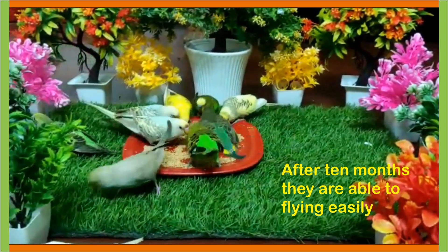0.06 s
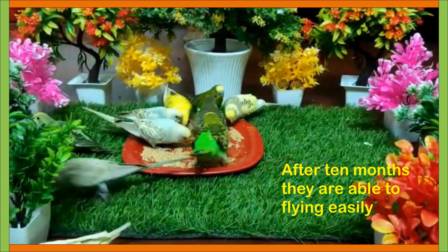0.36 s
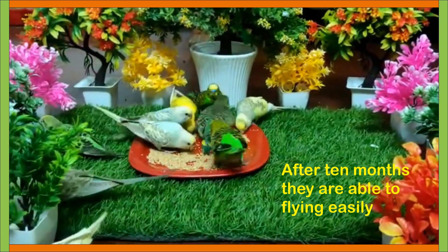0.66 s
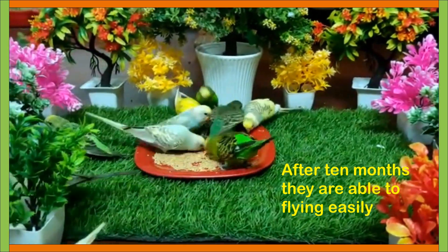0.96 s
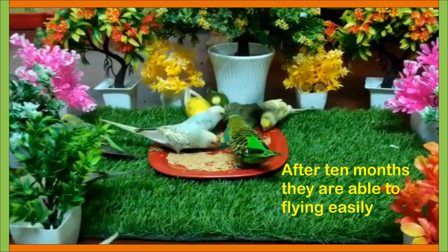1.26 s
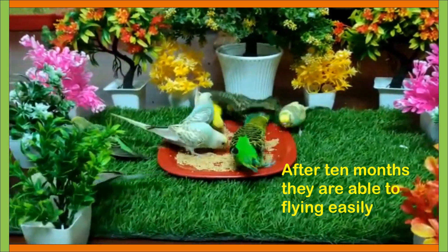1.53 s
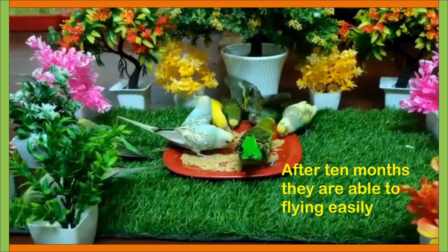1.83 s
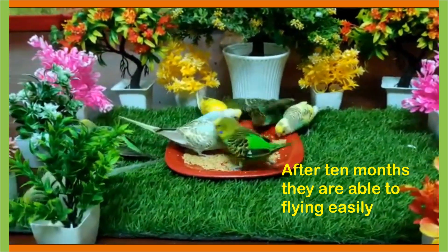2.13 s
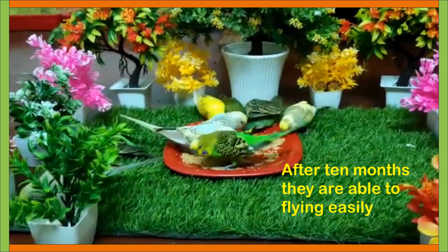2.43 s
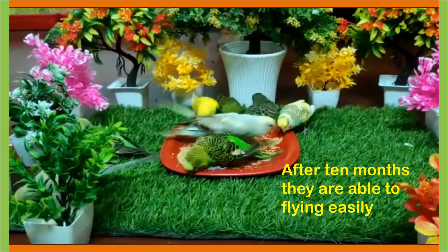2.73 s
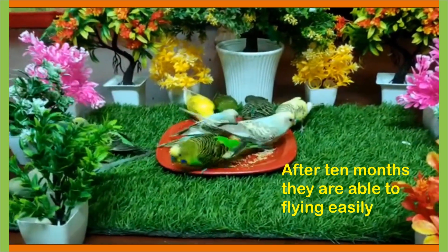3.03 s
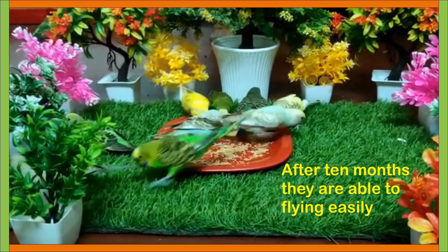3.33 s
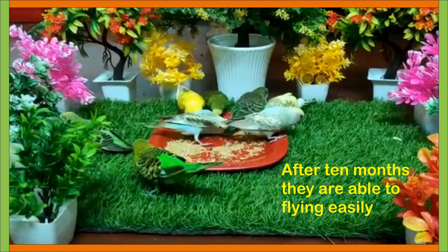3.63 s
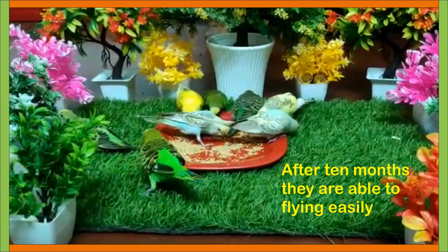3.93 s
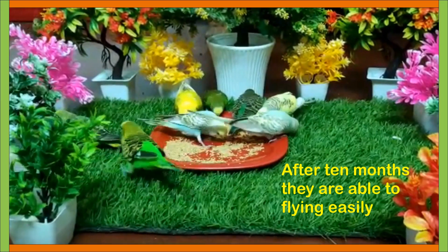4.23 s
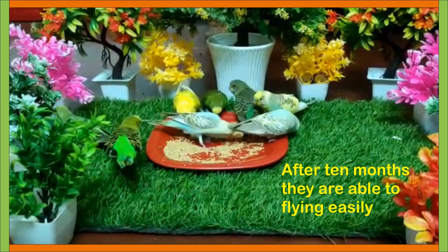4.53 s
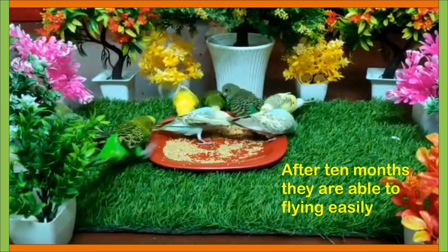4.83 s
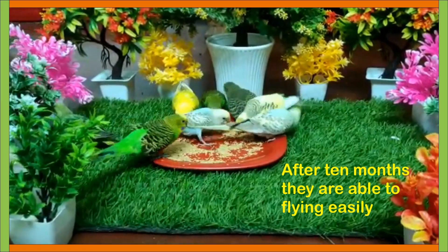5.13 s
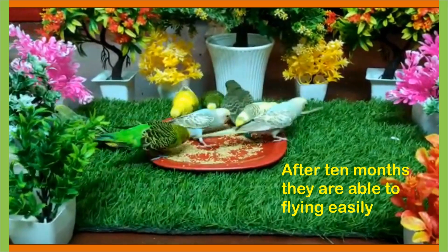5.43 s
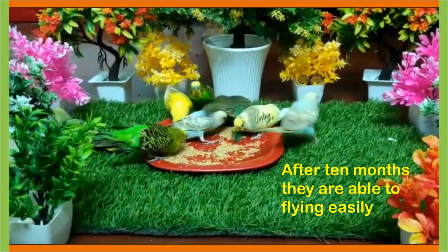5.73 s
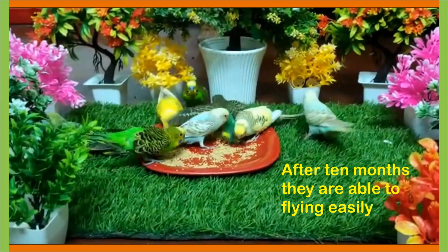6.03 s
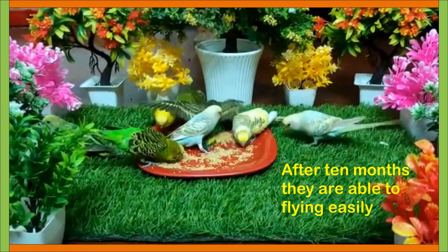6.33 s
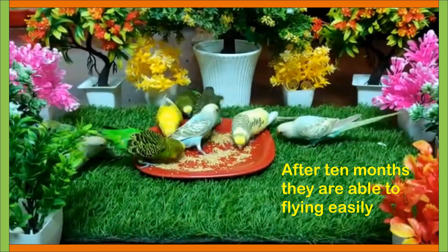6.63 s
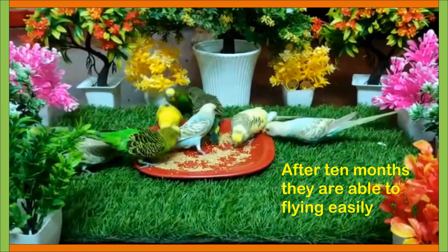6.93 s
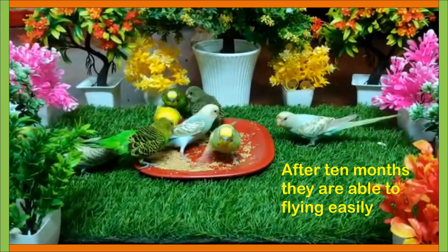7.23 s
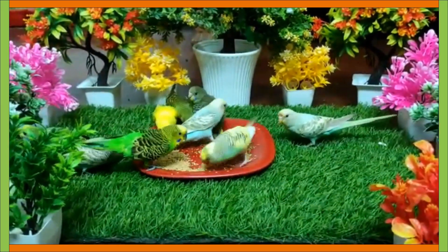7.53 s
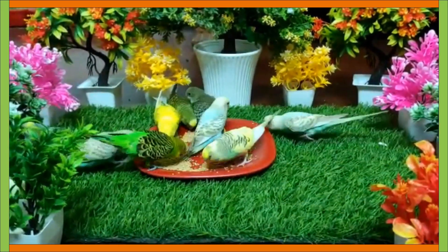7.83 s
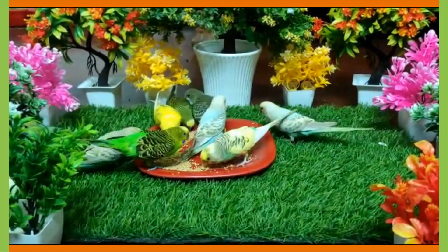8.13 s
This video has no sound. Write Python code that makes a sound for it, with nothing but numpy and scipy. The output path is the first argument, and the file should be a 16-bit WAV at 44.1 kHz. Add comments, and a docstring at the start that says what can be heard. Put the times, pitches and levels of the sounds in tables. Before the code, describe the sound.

Young budgerigars beg with wheezy rasps, hiss and squawk in a small room while seed husks crunch and beaks tap.

```python
"""Crunching seed and a swelling hiss come first, then the long wheezy rasps of young budgerigars begging
round a dish in a small room. Each rasp starts as a whistle on the membrane of the syrinx and breaks into
two fluttering strands. In between the birds hiss through narrow throats and squawk three times.
Clucks, beak taps, soft scuffles and one sharp, dry broadband click come through, over a bed of
low rumble, faint hum and thin air."""
import sys
import numpy as np
from scipy import signal
from scipy.fft import rfft, irfft, next_fast_len
from scipy.io import wavfile
from scipy.ndimage import map_coordinates

SR = 44100
rng = np.random.default_rng(int(sys.argv[2]) if len(sys.argv) > 2 else 0)


def unload_audio(sound):
    """Save the sound as a 16-bit wav file, at the path given as the first command line argument."""
    columns = np.transpose(np.atleast_2d(sound))
    # keep every value between -1 and 1, then stretch to whole-number steps
    steps = np.round(np.clip(columns, -1, 1) * 32767)
    wavfile.write(sys.argv[1], SR, steps.astype(np.int16))


N = 369116
T = np.arange(N) / SR

# EQ curves of the room's rumble and air: f/Hz, gain/dB
RUMBLE_EQ = [(22, 4.5), (42, -36), (60, 6.5), (105, -6), (145, 5), (200, -1), (290, -7.5), (420, -22),
             (700, -11.5), (2000, -79)]
AIR_EQ = [(100, 2.5), (500, 0.5), (680, 2), (1000, 4.5), (1500, -1), (2700, -3), (4500, -6), (6200, -5.5),
          (7700, 4.5), (8800, -4), (10000, -30), (15500, -23)]
# swells of the low drone and of the hum above it: t/s, length/s, level/dB
DRONE_SWELLS = [(0.28, 0.48, -57), (1.25, 0.94, -54), (3.3, 0.89, -56.5)]
HUM_SWELLS = [(0.2, 0.55, -68), (3.45, 0.35, -61.5), (4.72, 0.38, -61), (5.72, 0.72, -61),
              (7.88, 0.81, -53.5)]
# dull bumps: t/s, length/s, f/Hz, relative level/dB
BUMPS = [(6.076, 0.022, 343, -47), (6.419, 0.19, 281.7, -47.5), (7.699, 0.06, 366, -49),
         (8.168, 0.18, 317, -44.5), (8.174, 0.2, 54.5, -39.5)]
# wings and feet brushing the mat: t/s, length/s, level/dB
SCUFFLES = [(0.624, 0.18, -56.5), (1.035, 0.057, -52), (1.465, 0.082, -53.5), (2.035, 0.13, -63.5),
            (6.165, 0.078, -53), (7.098, 1.6, -62)]
# bouts of husking seed: t/s, length/s, level/dB
HUSK_BOUTS = [(0.0, 1.7, -52.5), (1.45, 1.69, -55), (3.45, 0.14, -50), (3.78, 0.34, -58), (4.47, 0.27, -62),
              (5.13, 0.22, -57), (5.62, 0.396, -56.5), (6.06, 0.44, -53), (7.18, 0.57, -53.5),
              (7.9, 0.58, -53.5)]
# a sharp, dry broadband click at 6.024 s; the other rows are beaks on seed and dish:
# t/s, ring level/dB, ring f/Hz, snap level/dB
CLICKS = [(0.4165, -29, 7440, -50), (0.4933, -44, 7500, -53), (0.62, -40, 7500, -46),
          (0.928, -58, 7500, -43), (0.9772, -53, 7000, -42), (1.636, -32.5, 7050, -41.5),
          (1.871, -40, 7500, -55), (2.2608, -53, 7500, -35), (2.6953, -33, 7500, -48),
          (3.215, -49, 5860, -56), (3.465, -45, 7500, -42), (3.7864, -50, 7940, -43),
          (3.944, -45, 7360, -58), (5.14, -46, 6900, -50), (5.286, -38.5, 7800, -54),
          (6.024, -46, 7500, -29), (6.175, -44, 7540, -38), (6.8206, -41, 6000, -44),
          (7.457, -37.5, 7640, -50), (7.69, -36.5, 7830, -53), (7.9264, -39, 7500, -55)]
# EQ curves of a cracking husk and of a click's snap: f/Hz, gain/dB
HUSK_EQ = [(1000, -19), (3000, -8), (8000, 10), (10000, -5), (14000, -11.5), (16000, -20)]
SNAP_EQ = [(300, -39), (1500, 4), (6000, 6), (10000, -1), (15000, -9)]
# short falling clucks: t/s, relative level/dB
CLUCKS = [(0.282, -69), (0.402, -42.5), (0.615, -52.5), (0.721, -52), (0.817, -42.5), (1.036, -43),
          (1.395, -51.5), (1.873, -54), (2.048, -48.5), (3.074, -54), (3.56, -51.5)]
# hisses: t/s, length/s, relative level/dB, level ramp/dB, wheeze start f/Hz, wheeze target f/Hz,
# squeak level/dB
HISSES = [(0, 0.52, -58.5, 13, 6600, 5890, -48), (0.411, 0.17, -39.5, -15, 5900, 5800, -54),
          (0.72, 0.49, -47.5, 3, 6090, 5420, -46), (1.839, 0.33, -51, -8.5, 5840, 4920, -47),
          (2.286, 0.19, -45.5, -12.5, 4340, 4230, -42.5), (2.698, 0.14, -51.5, -2, 5330, 5080, -50.5),
          (3.795, 0.044, -54, 7, 5300, 4810, -47), (4.451, 0.25, -48, -30, 4930, 4230, -47),
          (5.158, 0.11, -68, 2, 5000, 4800, -61), (5.291, 0.39, -51.5, -3.5, 5160, 4400, -49.5),
          (6.043, 0.49, -48.5, 0, 6170, 5180, -48.5), (6.817, 0.39, -50.5, -0.5, 5480, 4450, -47.5),
          (7.173, 0.22, -45.5, -2.5, 5620, 5020, -53), (7.691, 0.4, -47.5, -1.5, 5630, 4820, -46),
          (8.104, 0.25, -66, 25.5, 5700, 4900, -57)]
# squawks: t/s, length/s, relative crest level/dB, crest position/share of call, lower voice f/Hz,
# upper voice f/Hz, upper voice gain/dB, overtone trim/dB, opening roughness/0-1
SQUAWKS = [(2.802, 0.16, -29, 0.76, 3036, 3840, -0.5, -1.5, .45),
           (3.497, 0.165, -29, 0.68, 3118, 3950, 2.5, 0.5, 0.41),
           (4.675, 0.15, -29, 0.87, 3140, 4193, 1.5, 2, 0.97)]
# begging rasps: t/s, length/s, relative level/dB, level ramp/dB, pitch fall/Hz, whistle f/Hz,
# time to break/s, overtone trim/dB
BEGS = [(0.274, 0.5, -42, -3, 399.7, 3900, 0.045, 1), (1.087, 0.28, -33, -27.5, 1112, 4010, 0.053, 2.5),
        (1.417, 0.41, -41, -4, 411.7, 3804, 0.046, 0), (2.21, 0.52, -42, -5, 352, 3844, 0.054, 2),
        (3.229, 0.39, -42.5, 1.5, 247.7, 3937, 0.041, 0), (4.015, 0.41, -41.5, -5, 398.3, 3636, 0.056, 0.5),
        (5.59, 0.39, -42.5, -1, 302.6, 3705, .04, -0.5), (7.084, 0.54, -39.5, -7.5, 497, 3838, 0.041, -1),
        (7.991, 0.39, -40.5, 0, 296.7, 3776, 0.03, 1.5)]
# throat resonances for each kind of call: f/Hz, gain/dB
HISS_THROAT = [(800, -32), (1700, -2.5), (2200, -4), (2850, 26), (3600, 2), (4500, 24.5), (6300, 14.5),
               (7000, 15), (7800, 13.5), (8700, 17), (10000, -17), (15000, -33)]
SQUAWK_THROAT = [(400, -27), (1000, -10), (1700, 1), (2200, 9.5), (3050, 4), (4100, 4), (5100, 4),
                 (6100, 6), (6900, 2), (8000, 4.5), (9200, 1.5), (10200, -38), (15000, -18.5)]
BEG_THROAT = [(1000, -11), (1850, -2.5), (2250, 4), (2900, 6), (3650, 3), (4150, 9.5), (4600, 8.5),
              (5500, -10), (6600, -1), (7700, 6.5), (8900, 3), (10000, -18), (15000, -60)]
# stereo tilt: f/Hz, left minus right/dB
STEREO_TILT = [(150, 0), (500, 2.5), (2400, 0.5), (4000, 1.5), (8000, -4.5), (12000, -1.5)]


def undb(db):
    """Decibels to gain."""
    return 10 ** (np.asarray(db) / 20)


def unit(x):
    """Scale to rms 1."""
    return x / np.sqrt(np.mean(x ** 2) + 1e-18)


def eq(x, curve):
    """Filter by a curve of (f/Hz, gain/dB) points."""
    hz, db = np.transpose(curve)
    size = next_fast_len(len(x) + 1024)
    f = np.maximum(np.fft.rfftfreq(size, 1 / SR), 1)
    return irfft(rfft(x, size) * undb(np.interp(np.log(f), np.log(hz), db)), size)[:len(x)]


def noise(t, curve):
    """Noise of rms 1, coloured by an EQ curve."""
    return unit(eq(rng.standard_normal(len(t)), curve))


def wander(t, rate):
    """Smooth random modulation of spread near 1 that changes rate times a second."""
    return map_coordinates(rng.standard_normal(8192), [(t - t[0]) * rate], order=3, mode="wrap")


def phase_of(hz):
    """Running phase of a moving pitch."""
    return 2 * np.pi * np.cumsum(hz) / SR


def gate(t, fade_s):
    """Fade in and out."""
    return np.clip(np.minimum(t - t[0], t[-1] - t) / fade_s, 0, 1)


def swells(rows, fade_s):
    """Gain of (t/s, length/s, level/dB) swells that rise, hold and fall."""
    return sum(undb(db) * np.clip(np.minimum(T - s, s + length - T) / fade_s, 0, 1)
               for s, length, db in rows)


def add(track, start_s, sound):
    """Mix a sound into a track."""
    i = int(start_s * SR)
    track[i:i + len(sound)] += sound[:N - i]


def room(x, lead_ms, pan_db, wet_db, t60_s=0.39):
    """Direct sound reaches the right first; dense reflections differ per side. Positive pan is left."""
    t = T[:SR // 2]
    tails = rng.standard_normal((2, len(t))) * undb(-60 * t / t60_s) * (t > .002)
    tails /= np.linalg.norm(tails, axis=1, keepdims=True)
    delayed = map_coordinates(x, [np.arange(N) - lead_ms * SR / 1000], order=3)
    reverb = np.array([signal.fftconvolve(x, tail)[:N] for tail in tails])
    mix = np.array([delayed, x]) + undb(wet_db) * reverb
    return mix * undb([[pan_db / 2], [-pan_db / 2]]) / np.sqrt(1 + undb(2 * wet_db))


def room_air():
    """A thin, wide hiss whose level drifts a little."""
    left, right, centre = (noise(T, AIR_EQ) for _ in range(3))
    return (np.array([left, right]) + 0.22 * centre) * undb(-56 + 1.2 * wander(T, 8))


def rumble():
    """The room rumble grows, then holds, over a sub-bass shudder."""
    bed = noise(T, RUMBLE_EQ) * undb(np.interp(T, [0, 4.86], [-59.5, -53]))
    shudder = unit(wander(T, 22) * np.sin(2 * np.pi * 27.4 * T))
    return bed + undb(-66) * shudder


def humming(drone_hz=83.7, hum_hz=172.6):
    """A wavering drone and a hum about one and two octaves up, each swelling from a quiet floor."""
    drone = np.sin(phase_of(drone_hz * (1 + 0.0045 * wander(T, 11))))
    hum_phase = phase_of(hum_hz * (1 + 0.00958 * wander(T, 12)))
    hum = np.sin(hum_phase) + undb(-2) * np.sin(2 * hum_phase)
    drone_gain = undb(-67) + swells(DRONE_SWELLS, fade_s=0.17)
    hum_gain = undb(-75.5) + swells(HUM_SWELLS, fade_s=0.17)
    return drone_gain * drone + hum_gain * hum


def bumping():
    """Dull bumps: soft-edged low tones of unsteady pitch."""
    out = np.zeros(N)
    for start_s, length_s, hz, db in BUMPS:
        t = T[:int(length_s * SR)]
        tone = np.sin(phase_of(hz * (1 + 0.093 * wander(t, 129.6))))
        add(out, start_s, undb(db - 1.5) * np.hanning(len(t)) * tone)
    return out


def scuffling():
    """Jostling birds brush the mat in soft, grainy patches of midrange noise."""
    out = np.zeros(N)
    for start_s, length_s, db in SCUFFLES:
        t = T[:int(length_s * SR)]
        brush = noise(t, [(400, 6.5), (650, 12.5), (1050, 14), (1700, 8.5), (4000, -75)])
        grain = undb(3.6 * wander(t, 104.3))
        add(out, start_s, undb(db) * unit(brush * grain) * gate(t, 0.0022))
    return room(out, lead_ms=.11, pan_db=1.5, wet_db=-4)


def husking(cracks_per_s=900):
    """Seed husks splinter in small bites, each a cluster of crisp cracks, a few much louder."""
    impulses = (rng.random(N) < cracks_per_s / SR) * rng.choice([-1, 1], N)
    size_db = 3.5 * np.minimum(rng.exponential(size=N), 4)
    bite_db = 5 * wander(T, 20)
    splinter = rng.standard_normal(256) * np.exp(-T[:256] / .0006)
    cracks = signal.fftconvolve(impulses * undb(size_db + bite_db), splinter)[:N]
    crunch = unit(eq(cracks, HUSK_EQ)) * swells(HUSK_BOUTS, fade_s=0.0073)
    return room(crunch, lead_ms=0.132, pan_db=1, wet_db=-2)


def clicking(snap_s=0.00094, ring_s=0.0074):
    """Each click is a broadband snap with a brief treble ring; a dominant snap sounds sharp and dry."""
    out, t = np.zeros(N), T[:SR // 30]
    for start_s, ring_db, hz, snap_db in CLICKS:
        ring_eq = [(hz / 8, -36), (hz * .6, -20), (hz, 0), (hz * 1.1, -3), (hz * 1.35, -34)]
        ring = noise(t, ring_eq) * np.exp(-t / ring_s)
        snap = noise(t, SNAP_EQ) * np.exp(-t / snap_s)
        add(out, start_s, undb(ring_db) * ring + undb(snap_db) * snap)
    return room(out, lead_ms=.11, pan_db=1.5, wet_db=-4)


def clucking(note_hz=880, drop_hz=1620, drop_s=0.00166):
    """A dry click that drops from the treble to a hollow note within a few milliseconds."""
    out, t = np.zeros(N), T[:SR // 30]
    envelope = np.exp(-((t - .006) / .0065) ** 2) * gate(t, 0.00037)
    for start_s, db in CLUCKS:
        tone = np.sin(phase_of(note_hz + drop_hz * np.exp(-t / drop_s) + 80 * wander(t, 615)))
        knock = noise(t, [(400, -20), (900, 0), (2200, -8), (4000, -30)])
        add(out, start_s - .001, undb(db + 2.5) * envelope * (tone + undb(-5) * knock))
    return room(out, lead_ms=0.16, pan_db=1.5, wet_db=-8)


def effort(start_s, length_s, level_db, ramp_db, onset_db, attack_s):
    """Sample times and level/dB of a call: the onset settles quickly into a steady fade or push."""
    t = np.arange(start_s, start_s + length_s, 1 / SR)
    age = t - start_s
    return t, level_db + ramp_db * age / length_s + onset_db * np.exp(-age / attack_s)


def moving_throat(t, x, curve, shift=.045, moves_per_s=28):
    """Resonances shift as the throat widens and narrows."""
    wide = eq(x, [(hz * (1 - shift), db) for hz, db in curve])
    narrow = eq(x, [(hz * (1 + shift), db) for hz, db in curve])
    tightness = (1 + np.tanh(2 * wander(t, moves_per_s))) / 2
    return unit(wide + tightness * (narrow - wide))


def note_run(t, gap_s=.036, fade_s=.026, slide_hz=100, scatter_hz=340, scatter_db=3):
    """Gain and pitch offset/Hz of a run of short notes: each starts sharply, slides down and fades."""
    gap, pitch, size = rng.uniform(-1, 1, (64, 3)).T
    starts = np.append(0, np.cumsum(gap_s * (1 + gap / 2)))
    note = np.searchsorted(starts, t - t[0], side="right") - 1
    age = t - t[0] - starts[note]
    gain = undb(scatter_db * size[note]) * np.minimum(age / .002, 1) * np.exp(-age / fade_s)
    return unit(gain), scatter_hz * pitch[note] + slide_hz * (1 - age / fade_s)


def scratchy_tone(t, hz):
    """A thin tone, frayed by a waver and a faster jitter in its pitch."""
    return unit(np.sin(phase_of(hz + 220 * wander(t, 200) + 220 * wander(t, 1200))))


def hissing(twitter_hz=7520, squeak_hz=2729, squeak_fall_hz=411.5):
    """Wheezy sinking notes over air rattling in a narrow throat; a twitter above, a squeak below."""
    out = np.zeros(N)
    for *shape, first_hz, target_hz, squeak_db in HISSES:
        t, db = effort(*shape, onset_db=3, attack_s=.03)
        share = (t - t[0]) / (t[-1] - t[0])
        note_gain, bend_hz = note_run(t)
        wheeze_hz = target_hz + (first_hz - target_hz) * np.exp(-share / .3)
        wheeze = note_gain * scratchy_tone(t, wheeze_hz + bend_hz)
        twitter = note_gain * scratchy_tone(t, twitter_hz + bend_hz)
        warble_hz = squeak_hz - squeak_fall_hz * share + 200 * wander(t, 70) + 250 * wander(t, 500)
        squeak = unit(np.sin(phase_of(warble_hz)) * undb(2 * wander(t, 110)))
        breath = moving_throat(t, rng.standard_normal(len(t)), HISS_THROAT)
        rattle = unit(undb(3.2 * wander(t, 380)))
        rush = undb(3.5) * wheeze + undb(-1.5) * twitter + undb(-2.5) * breath
        add(out, t[0], rattle * (undb(db) * rush + undb(squeak_db) * squeak) * gate(t, .008))
    return room(out, lead_ms=0.12, pan_db=0, wet_db=1)


def syrinx(t, hz, rough, swing_hz, jump_hz, flutter_hz, shimmer_db, second_db, third_db):
    """A whistling membrane; when rough, it flutters and leaps between a high and a low pitch."""
    flutter = phase_of(flutter_hz * (1 + 0.2204 * wander(t, 300)))
    leaps = np.tanh(2 * wander(t, 170))
    phase = phase_of(hz + rough * (swing_hz * np.sin(flutter) + jump_hz * leaps))
    strength = undb(shimmer_db * wander(t, 198.3)) * (1 + .5 * rough * np.cos(flutter))
    tone = np.sin(phase) + undb(second_db) * np.sin(2 * phase) + undb(third_db) * np.sin(3 * phase)
    breath = undb(-16) * rough * rng.standard_normal(len(t))
    return strength * (tone + breath)


def squawking(step_hz=484.7, step_share=0.42, upper_fall_hz=350, waver_hz=120):
    """Two rough voices at once, in ragged spurts; the lower one steps up in pitch and takes the lead."""
    out = np.zeros(N)
    for start_s, length_s, db, crest, lower_hz, upper_hz, upper_db, overtone_db, first_rough in SQUAWKS:
        t = np.arange(start_s, start_s + length_s, 1 / SR)
        share = (t - start_s) / length_s
        swell_db = np.interp(share, [0, crest, 1], [-10.5, 0, -7.5])
        stepped = (1 + np.tanh((share - step_share) / 0.0895)) / 2
        low_hz = lower_hz - step_hz * (1 - stepped) + waver_hz * wander(t, 89.7)
        high_hz = upper_hz - upper_fall_hz * (share - step_share) + waver_hz * wander(t, 109.74)
        rough = np.interp(share, [0, .5], [first_rough, .33])
        lower = syrinx(t, low_hz, rough, swing_hz=650, jump_hz=300, flutter_hz=850,
                       shimmer_db=3, second_db=overtone_db - 10, third_db=overtone_db - 15)
        upper = syrinx(t, high_hz, rough, swing_hz=1000, jump_hz=450, flutter_hz=850,
                       shimmer_db=3, second_db=overtone_db - 6, third_db=-25)
        voices = lower * undb(-8.5 * (1 - stepped)) + upper * undb(upper_db - 5.5 * stepped)
        breath = undb(-10) * stepped * rng.standard_normal(len(t))
        spurts = undb(4.5 * np.tanh(wander(t, 145.2)))
        squawk = unit(eq((voices + breath) * spurts, SQUAWK_THROAT))
        add(out, t[0], squawk * undb(db + swell_db + 4) * gate(t, 0.0064))
    return room(out, lead_ms=0.091, pan_db=0.5, wet_db=3)


def begging(upper_hz=3380, lower_hz=2726, scoop_hz=520, sag_hz_per_s=2600, throb_hz=98):
    """A soft arching whistle flares bright, then splits into two warbling strands that throb and sink."""
    out = np.zeros(N)
    for start_s, length_s, level_db, ramp_db, fall_hz, top_hz, break_s, overtone_db in BEGS:
        t, db = effort(start_s, length_s, level_db, ramp_db, onset_db=-2, attack_s=.015)
        age = t - t[0]
        broken = 1 - np.exp(-(age / break_s) ** 3)  # 0 is whistle, 1 is rasp
        scoop = np.exp(-age / .014)  # the whistle starts flat and dull
        whistle_hz = top_hz - scoop_hz * scoop - sag_hz_per_s * age
        high_hz, low_hz = (hz - fall_hz * age / length_s + 200 * wander(t, 75)
                           for hz in (upper_hz, lower_hz))
        high_hz = whistle_hz + broken * (high_hz - whistle_hz)
        flare_db = 4 * np.exp(-((age - .07) / .09) ** 2)
        flicker_db = 3 * wander(t, 59.4)
        bright_db = overtone_db + flare_db + flicker_db - 12 * scoop
        upper = syrinx(t, high_hz, rough=.33 + .15 * broken, swing_hz=330, jump_hz=260, flutter_hz=480,
                       shimmer_db=3.5, second_db=bright_db - 8, third_db=-30)
        lower = syrinx(t, low_hz, rough=.5, swing_hz=330, jump_hz=260, flutter_hz=430,
                       shimmer_db=3.5, second_db=bright_db - 12, third_db=bright_db - 11)
        strands = (upper + undb(-1.5) * broken * lower) / np.sqrt(1 + broken)
        throb = 1 + .35 * np.sin(phase_of(throb_hz * (1 + .25 * wander(t, 60))))
        rasp = moving_throat(t, strands * throb, BEG_THROAT)
        add(out, t[0], rasp * undb(db + 6) * gate(t, .008))
    return room(out, lead_ms=0.11, pan_db=0, wet_db=1.5)


def scene():
    """The flock feeds and calls over a room bed whose low end leans left."""
    low_end = (rumble() + humming() + bumping()) * undb([[2.3], [-2.9]])
    small_sounds = scuffling() + husking() + clicking()
    calls = clucking() + hissing() + squawking() + begging()
    return room_air() + low_end + small_sounds + calls


def record(dry, top_hz=15800):
    """The mids lean left and the high treble leans right; a steep low-pass trims the top."""
    left = eq(dry[0], [(hz, db / 2) for hz, db in STEREO_TILT])
    right = eq(dry[1], [(hz, -db / 2) for hz, db in STEREO_TILT])
    return signal.sosfilt(signal.ellip(8, .2, 70, top_hz, fs=SR, output="sos"), [left, right])


dry = scene()
out = record(dry)
unload_audio(out)
```